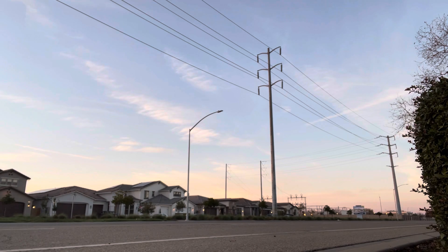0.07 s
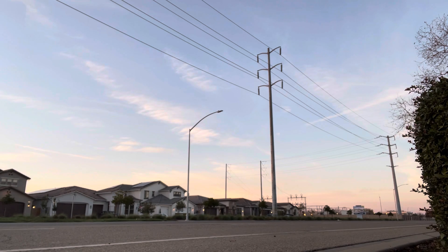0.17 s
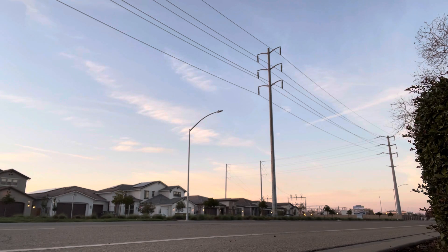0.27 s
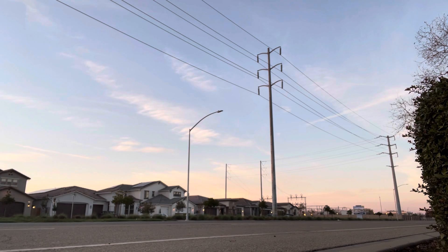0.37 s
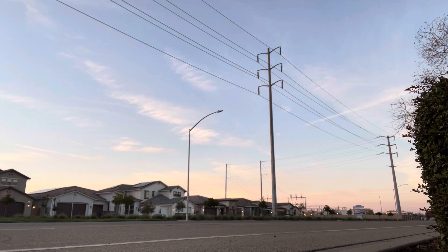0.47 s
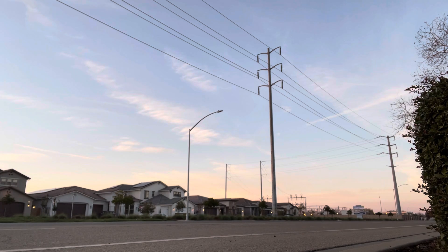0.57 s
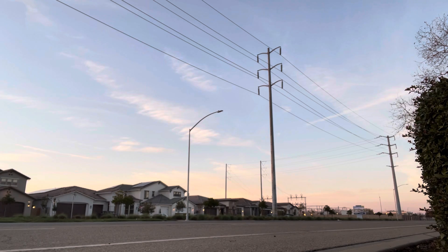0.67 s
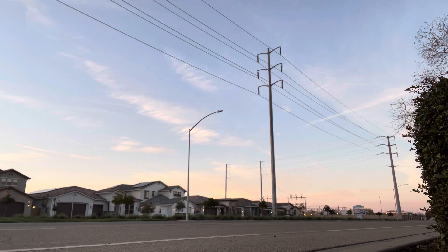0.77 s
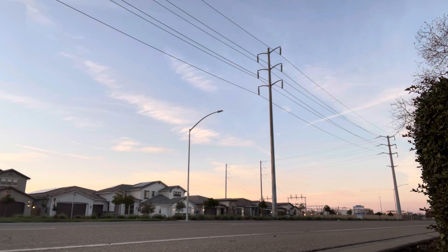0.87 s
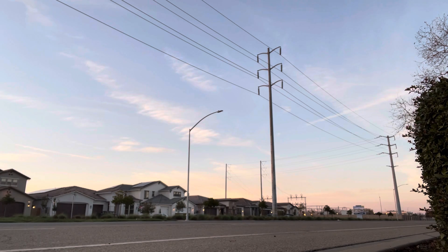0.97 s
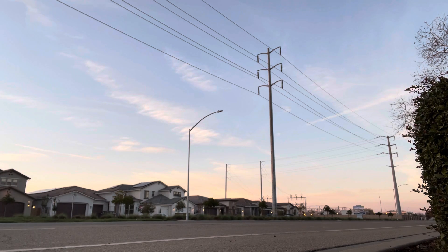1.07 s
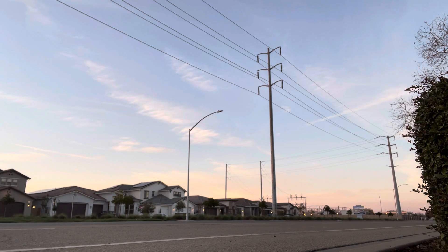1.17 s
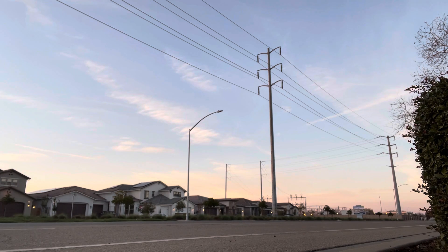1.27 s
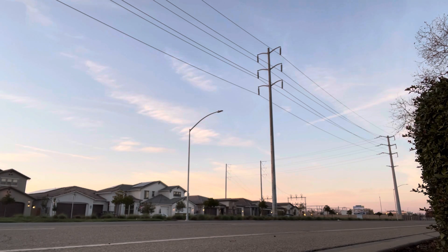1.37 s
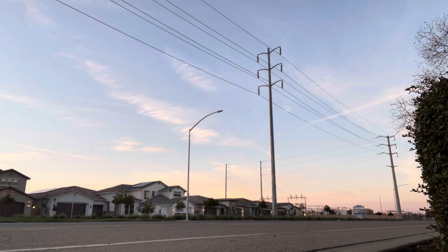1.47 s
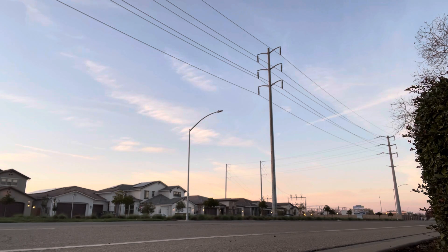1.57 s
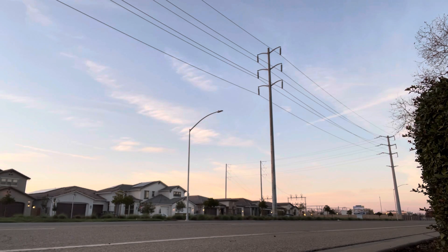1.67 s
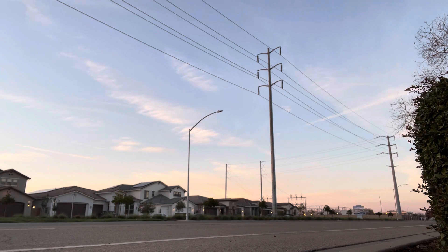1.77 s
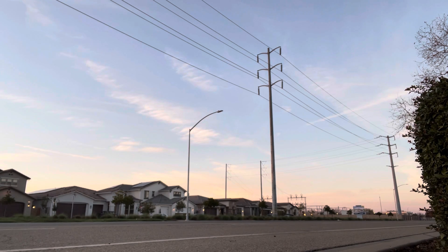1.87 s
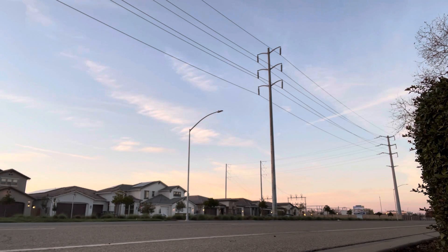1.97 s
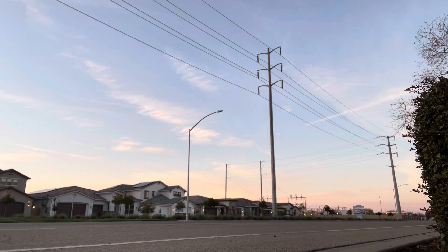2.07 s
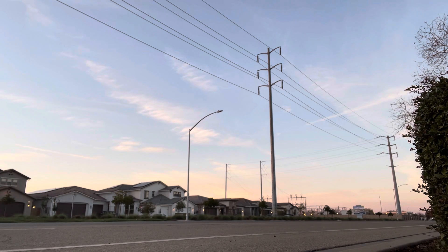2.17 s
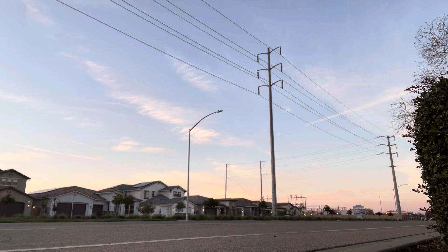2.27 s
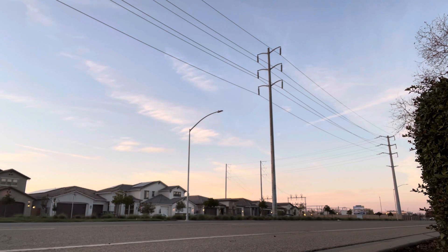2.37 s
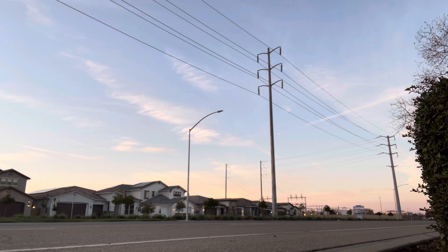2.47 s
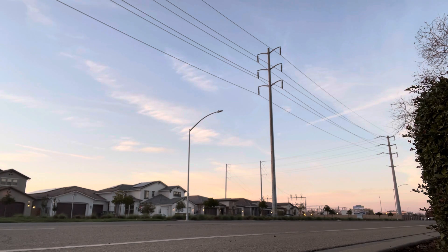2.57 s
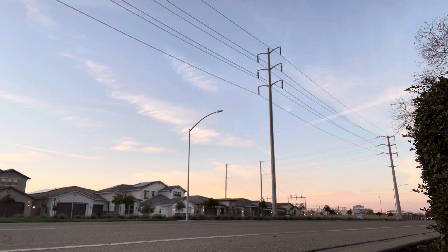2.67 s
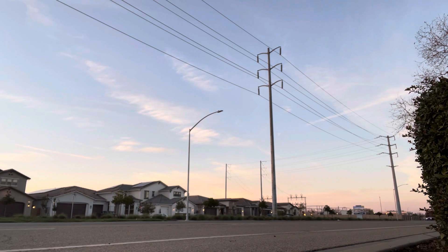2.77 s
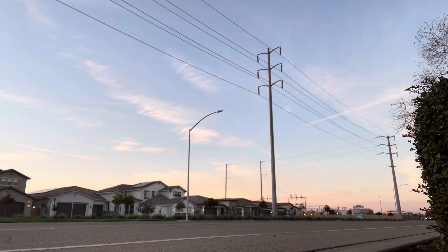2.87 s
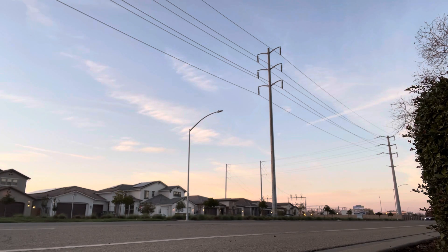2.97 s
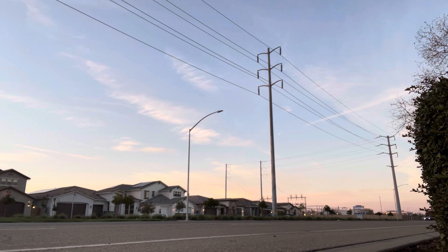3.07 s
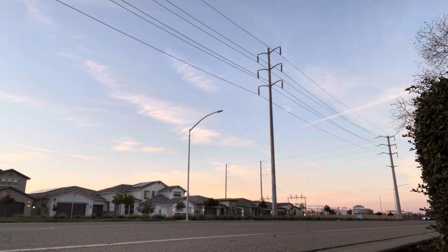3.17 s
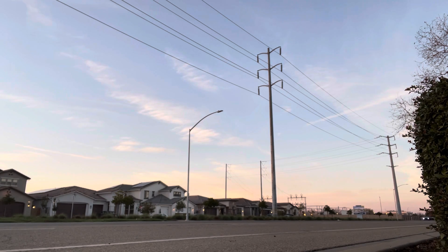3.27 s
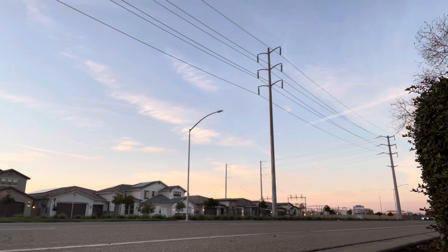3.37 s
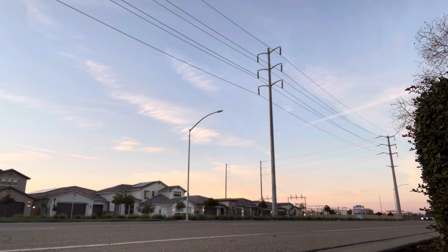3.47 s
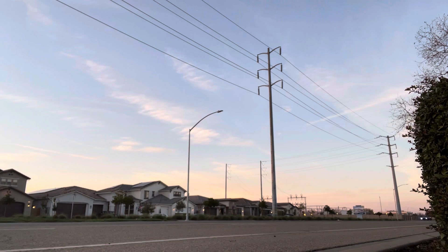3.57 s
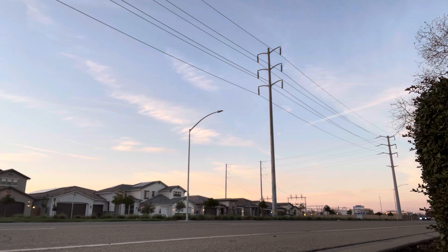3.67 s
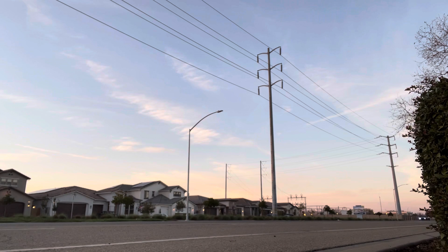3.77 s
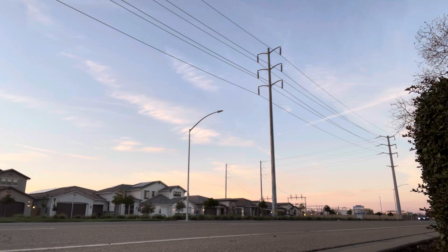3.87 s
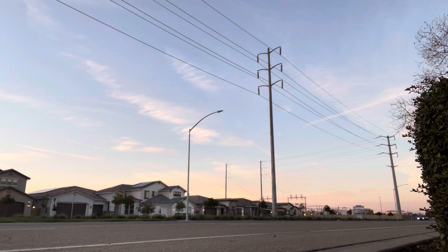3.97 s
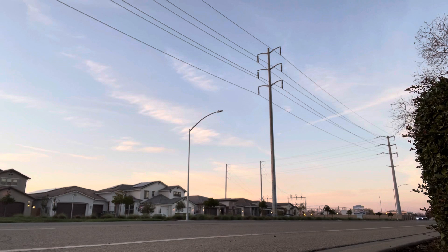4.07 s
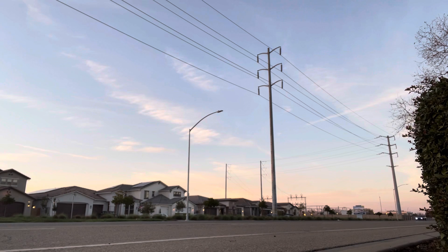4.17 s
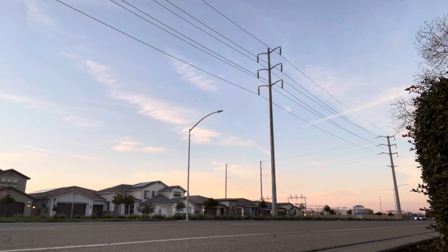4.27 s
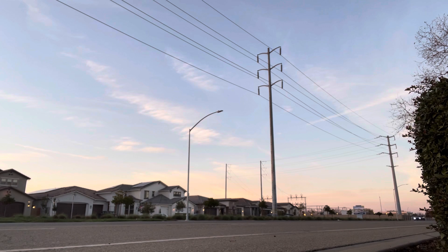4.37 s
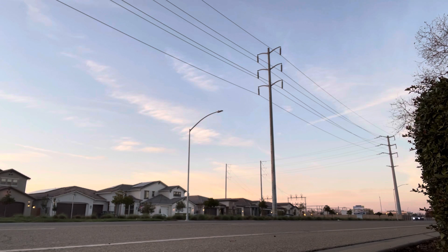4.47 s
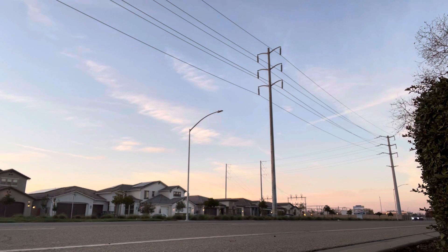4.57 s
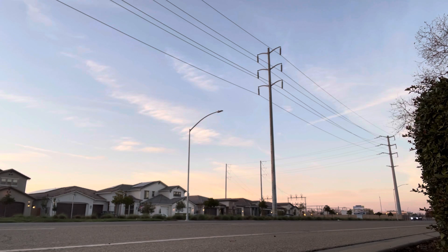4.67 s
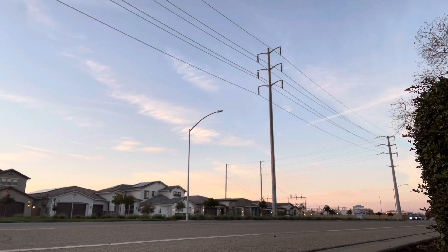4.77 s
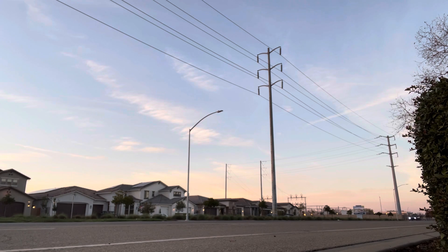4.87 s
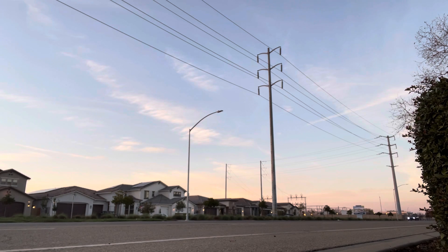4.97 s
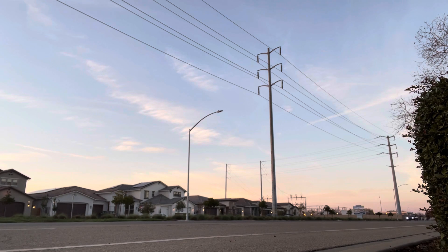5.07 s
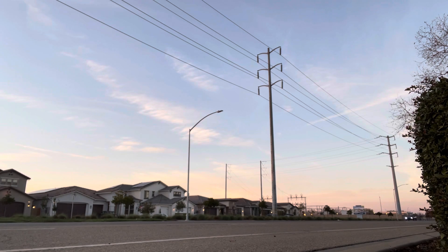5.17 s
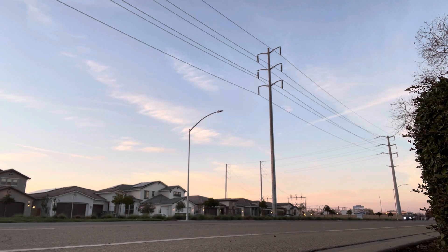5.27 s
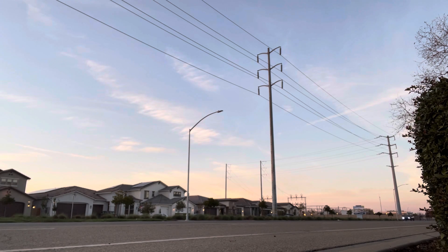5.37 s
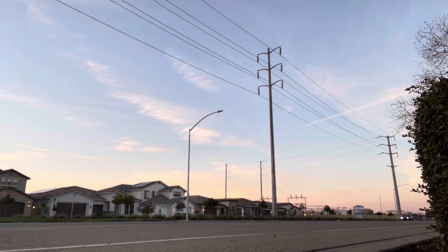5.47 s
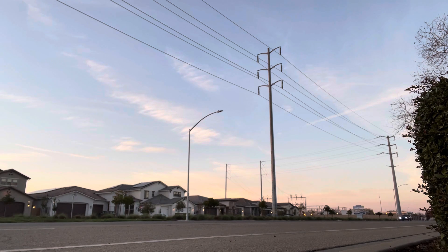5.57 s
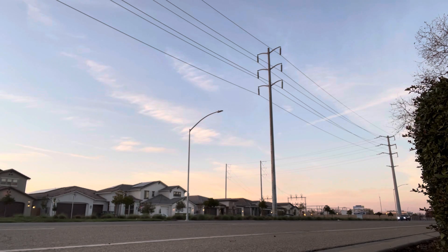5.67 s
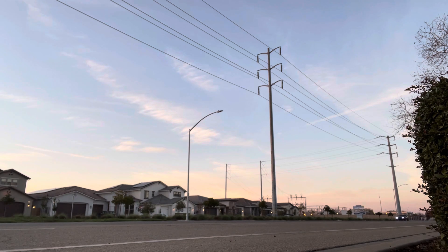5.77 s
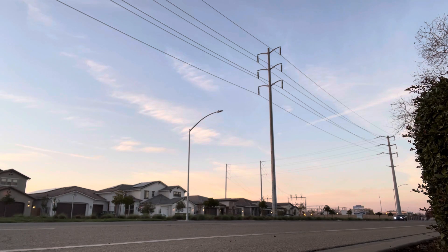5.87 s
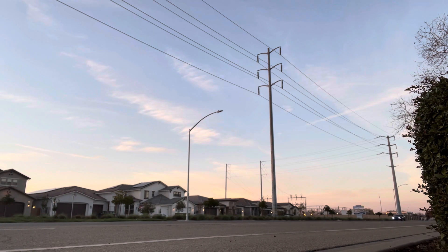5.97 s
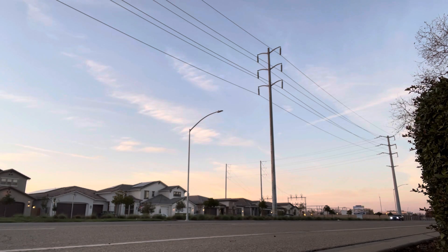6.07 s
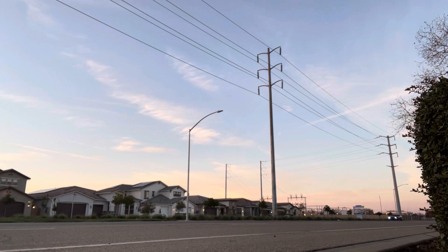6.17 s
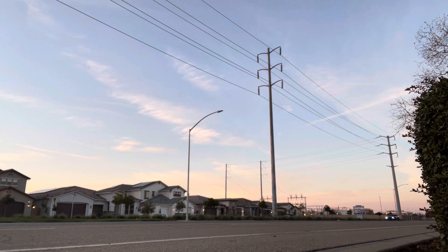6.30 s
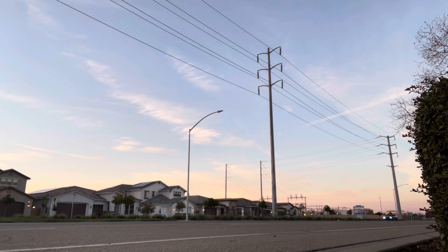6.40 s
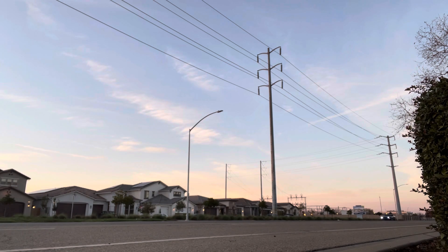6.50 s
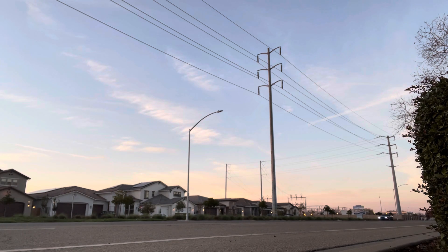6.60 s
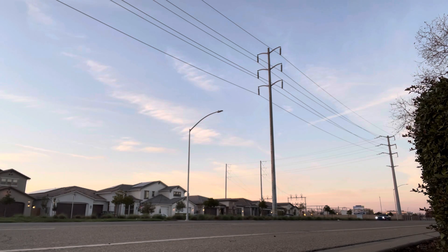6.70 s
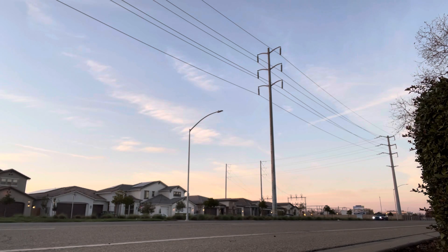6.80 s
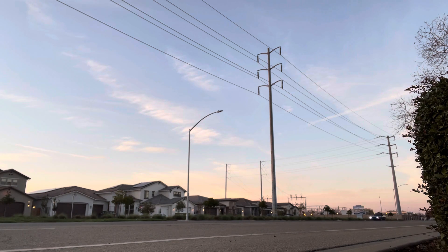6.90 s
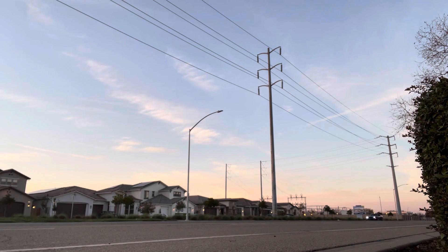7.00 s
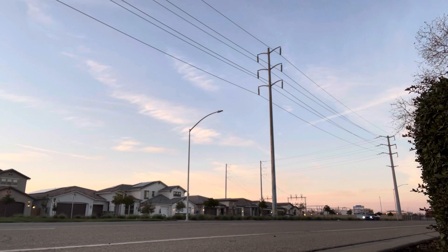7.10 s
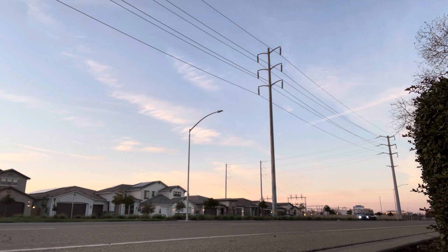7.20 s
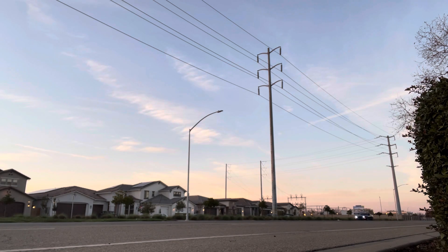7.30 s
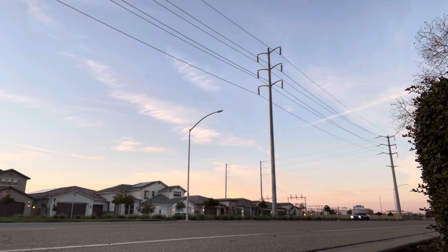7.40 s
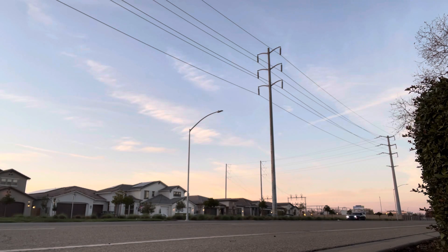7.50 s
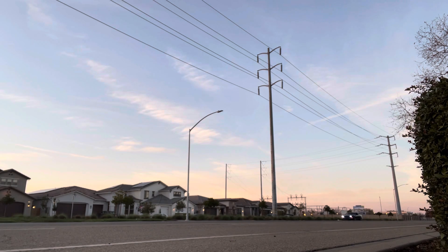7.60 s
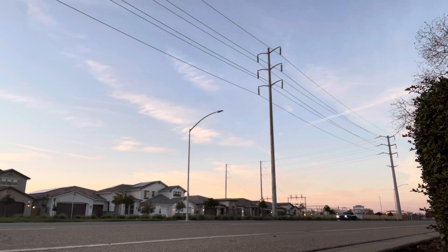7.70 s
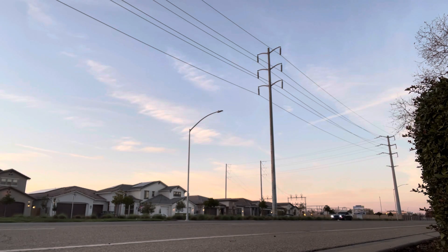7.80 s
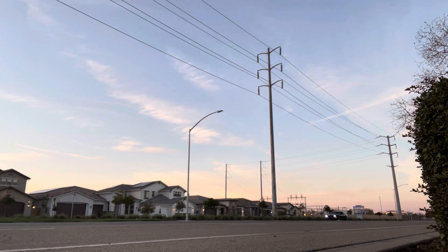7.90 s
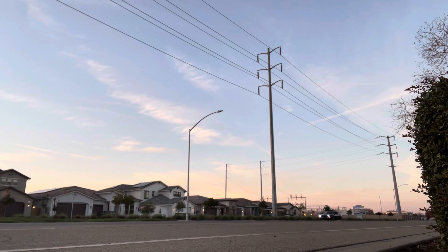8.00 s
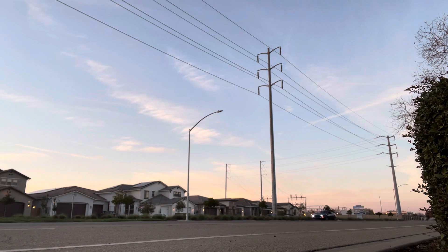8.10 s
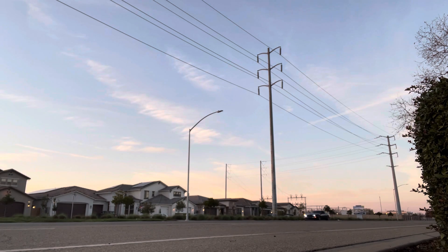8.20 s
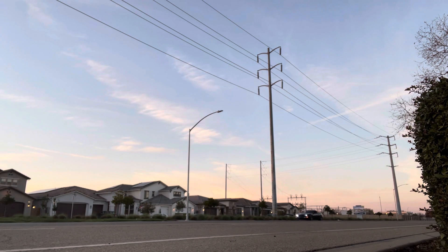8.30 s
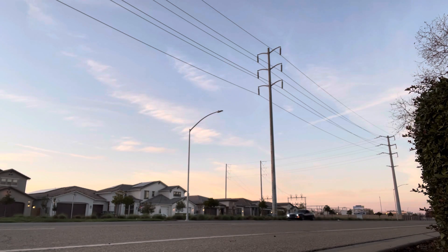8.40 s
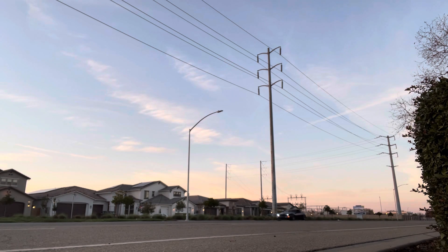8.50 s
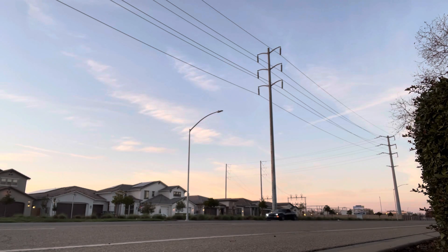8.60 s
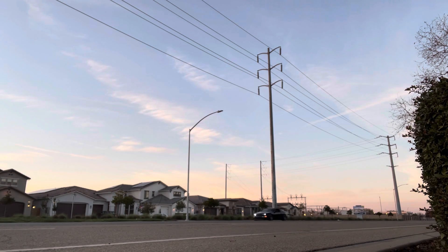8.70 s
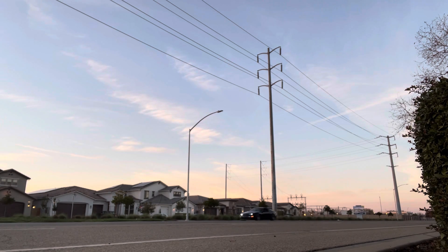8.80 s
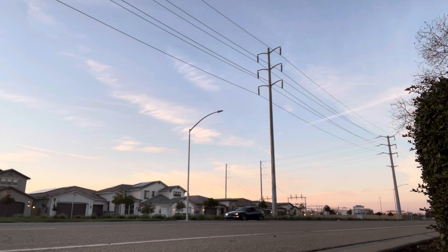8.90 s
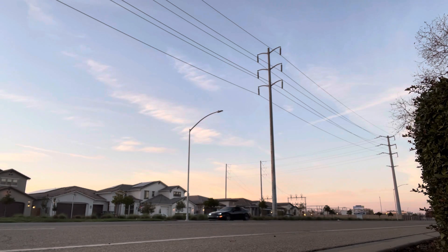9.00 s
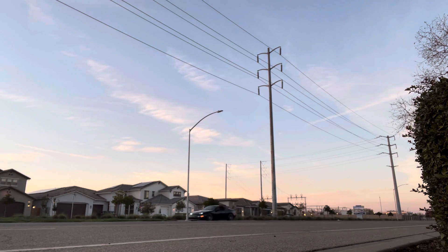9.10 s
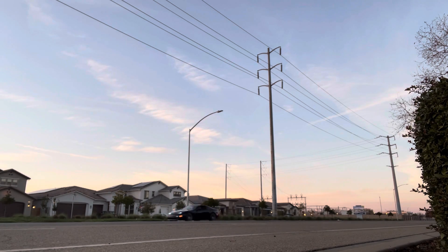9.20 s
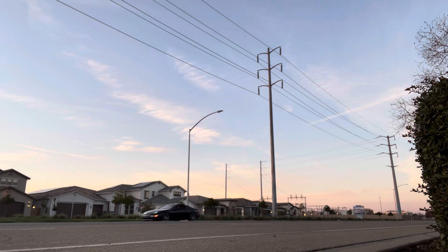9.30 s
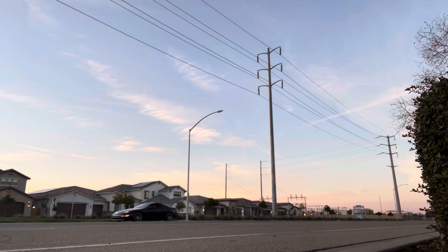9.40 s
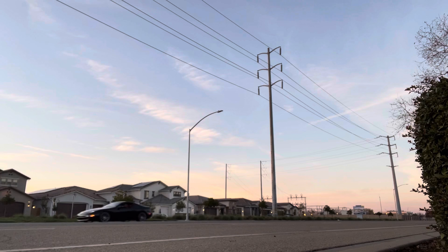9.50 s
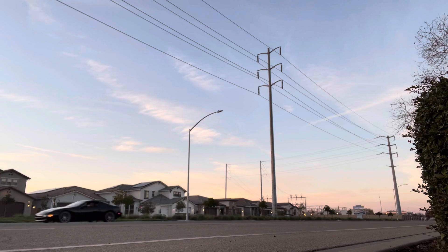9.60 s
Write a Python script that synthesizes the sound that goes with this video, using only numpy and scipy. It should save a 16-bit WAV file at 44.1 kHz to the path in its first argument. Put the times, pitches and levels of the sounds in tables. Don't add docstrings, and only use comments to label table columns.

```python
import sys
import numpy as np
from scipy import signal
from scipy.fft import rfft, irfft, next_fast_len
from scipy.io import wavfile
from scipy.ndimage import uniform_filter1d

SR = 44100
rng = np.random.default_rng(int(sys.argv[2]) if len(sys.argv) > 2 else 0)


def pcm_store(signal):
    levels = np.round(np.clip(np.atleast_2d(signal), -1, 1) * 32767)
    wavfile.write(sys.argv[1], SR, levels.astype(np.int16).T)


def volts(x):
    e = np.asarray(x, float) / 20
    return 10 ** e


N = 425565
T = np.arange(N) / SR
M = next_fast_len(N)
F = np.fft.rfftfreq(M, 1 / SR)


def curve(table):
    s, *columns = np.transpose(table)
    return [np.interp(T, s, c) for c in columns]


def over_hz(table, hz=F):
    f, v = np.transpose(table)
    return np.interp(np.log(hz + 1), np.log(f + 1), v)


def walk(rate):
    hold = int(SR / rate)
    steps = np.repeat(rng.standard_normal(N // hold + 1), hold)
    return 1.3 * uniform_filter1d(uniform_filter1d(steps, hold), hold)[:N]


def passing(s, half_s, t=T):
    return np.exp(-((t - s) / half_s) ** 2)


def tone(table, wobble=0., fade_s=.01):
    hz, db = curve(table)
    gate = np.clip(np.minimum(T - table[0][0], table[-1][0] - T) / fade_s, 0, 1)
    phase = 2 * np.pi * np.cumsum(hz * (1 + wobble)) / SR
    return np.sqrt(2) * gate * volts(db) * np.sin(phase)


def bands(colour, gain_db, flicker_db, swell_db):
    noise = rfft(rng.standard_normal(M)) * volts(over_hz(colour))
    out, swell = 0, swell_db * walk(0.51)
    for hz in 22 * 2 ** np.arange(0, 10, .5):
        share = np.cos(np.pi / 2 * np.clip(2 * np.log2((F + 1) / hz), -1, 1)) ** 2
        out = out + irfft(noise * share, M)[:N] * volts(gain_db(hz) + swell + flicker_db * walk(9))
    return out


# pitch_hz, lead_rad
PORT_PHASE = [(1, 0), (60, -.5), (260, -1.4), (690, -1.8), (1290, -1.7), (1600, -2.5), (2300, -2),
              (3100, -2.7), (4500, -1.8), (7000, -2.2), (8600, -2.85), (9700, -2.7), (10600, -.8)]
# pitch_hz, level_db
PORT_LEVEL = [(60, 1), (140, 0), (250, -1), (500, -3.5), (800, -10.5), (1230, -10.5), (1900, -2.5),
              (2900, 5.5), (8000, 0.2), (12000, -6.5)]
# pitch_hz, likeness (0-1)
PORT_LIKENESS = [(40, .97), (120, .78), (250, .55), (500, .25), (1000, .78), (2000, .92), (4000, .6),
                 (7000, .85), (9000, .9), (12000, .5)]


def ports(direct, scattered, side_on):
    hz, s, near = signal.stft(direct, SR, nperseg=1024)
    diffuse = signal.stft(scattered, SR, nperseg=1024)[2]
    like = np.clip(over_hz(PORT_LIKENESS, hz), 0, 1)[:, None]
    bass_share = 1 / (1 + (hz / 4000) ** 4)
    share = 1 - np.outer(bass_share, 1 - np.interp(s, T, side_on + 0 * T))
    half = volts(over_hz(PORT_LEVEL, hz)[:, None] * share / 2)
    turn = np.exp(1j * over_hz(PORT_PHASE, hz)[:, None] * share)
    left = (like * near + np.sqrt(1 - like ** 2) * diffuse) * half * turn
    return signal.istft(np.array([left, near / half]), SR)[1][:, :N]


# pitch_hz, level_db (per Hz)
TRAFFIC_COLOUR = [(20, -14), (50, 10), (90, 19), (190, 8.5), (310, 9), (420, -3), (650, 0), (1050, -0.5),
                  (1350, -4), (1700, -12.5), (2500, -25.5), (3300, -41.5), (7000, -48.5), (13000, -49.5)]
# pitch_hz, level_db
HUM = [(120, -40.5)]
# start_s, pitch_hz, level_db
COAST = [
    (0.6, 86.5, -56),
    (0.876, 78.2, -48),
    (0.99, 70.4, -43.5),
    (1.328, 61.7, -65),
    (1.35, 63.6, -59),
]


def town():
    far, spread = (bands(TRAFFIC_COLOUR, lambda hz: 0, flicker_db=1.4, swell_db=.8) for _ in range(2))
    scale = volts(-44) / far.std()
    hum = np.zeros(N)
    for hz, db in HUM:
        hum += np.sqrt(2) * volts(db + 1.2 * walk(3.1)) * np.sin(2 * np.pi * hz * T + .7 * walk(6.8))
    return ports(scale * far + hum + tone(COAST, fade_s=0.066), scale * spread, 1.0)


def glide(s, length, from_hz, to_hz, db, **how):
    peak = 0.3
    return tone([(s, from_hz, db - 5.5),
                 (s + peak * length, from_hz + peak * (to_hz - from_hz), db),
                 (s + length, to_hz, db - 7.5)], **how)


# share of length (0-1), pitch_hz, level_db
TRILL_SHAPE = [(0, 6580, -26), (.07, 6900, -9.5), (.36, 7380, -3.5), (0.521, 7390, -1.5), (.62, 7430, -4),
               (.92, 7880, -1), (.96, 7470, 2), (1, 7170, -14.5)]
# start_s, length_s, pitch factor, level_db
TRILLS = [
    (3.259, .455, .99, -69),
    (4.24, .435, 1.01, -72),
]


def trills():
    out = np.zeros(N)
    for s, length, factor, db in TRILLS:
        call = [(s + u * length, factor * hz, db + d) for u, hz, d in TRILL_SHAPE]
        out += tone(call, .008 * walk(160)) * volts(3.0 * walk(70))
    return out


# time after start_s, pitch_hz, level_db
BUZZ_SHAPE = [(0, 850, -12), (.012, 1003, -1.5), (.02, 1023, 7), (.025, 1096, -5), (.031, 1150, 5.5),
              (.042, 1150, -2), (.058, 1030, -8)]
# pitch_hz, level_db
THROAT = [(3000, -22), (4200, -8), (5300, 9), (7000, 0), (8300, -20), (9500, -27)]
# start_s, level_db, brightness_db (per octave)
BUZZES = [
    (.503, -81, -3),
    (1.855, -83.5, -20),
    (2.757, -77, -5),
]


def buzzes():
    out, rough = np.zeros(N), .034 * walk(400)
    for s, db, bright_db in BUZZES:
        for k in range(3, 11):
            tilt_db = bright_db * np.log2(k / 5)
            call = [(s + t, k * hz, db + d + over_hz(THROAT, k * hz) + tilt_db) for t, hz, d in BUZZ_SHAPE]
            out += tone(call, rough, fade_s=.006) * volts(4 * walk(120))
    return out


# start_s, level_db, pitch_hz (centre), width_hz, length_s
CHIPS = [(3.443, -75, 4270, 796, .04), (3.953, -75.5, 5300, 2010, 0.018), (6.26, -67, 6200, 1400, 0.24),
         (7.18, -63.5, 6140, 1400, 0.19), (7.347, -67.5, 6500, 900, .12), (7.25, -56, 3180, 220, .07),
         (3.09, -76, 5500, 600, .03), (1.05, -77, 2400, 2200, .07)]


def chips():
    out, size = np.zeros(N), 16384
    hz = np.fft.rfftfreq(size, 1 / SR)
    for s, db, centre_hz, width_hz, length in CHIPS:
        band = np.exp(-((hz - centre_hz) / width_hz * 2) ** 2)
        puff = irfft(rfft(rng.standard_normal(size)) * band)
        swell = np.sin(np.pi * np.clip(T[:size] / length, 0, 1) ** .7) ** 2
        out[int(s * SR):int(s * SR) + size] += puff * swell * volts(db) / puff.std()
    return out


# start_s, length_s, from_hz, to_hz, level_db
SLIDES = [
    (4.133, .04, 9200, 7700, -74.5),
]
# start_s, length_s, from_hz, to_hz, level_db
SEEPS = [
    (5.17, .11, 6900, 8100, -76),
    (6.05, 0.11, 6600, 7900, -67),
    (6.96, 0.12, 6200, 8295, -62.5),
]
# start_s, pitch_hz, level_db
WARBLES = [
    [(.236, 5900, -80), (.247, 5150, -71), (.266, 5750, -74), (.275, 5050, -67), (.284, 5500, -74),
     (.291, 5100, -75), (.305, 3200, -86)],
    [(1.755, 6400, -86), (1.769, 5250, -76), (1.787, 5070, -73), (1.795, 5400, -74), (1.803, 5000, -69),
     (1.817, 4600, -75), (1.828, 3400, -88.5)],
]
# start_s, pitch_hz, level_db
DROP = [
    (4.132, 4550, -67),
    (4.165, 3930, -81.5),
    (4.225, 3820, -76.5),
    (4.244, 4300, -77.5),
]
# start_s, pitch_hz, level_db
WHISTLE = [(4.14, 2190, -66), (4.186, 2230, -65), (4.308, 2280, -58), (4.43, 2619, -52.5),
           (4.512, 2850, -55), (4.55, 2910, -64.5), (4.578, 2900, -52), (4.605, 2900, -61)]


def birds():
    clean = sum(glide(*c, fade_s=.004) for c in SLIDES)
    clean += sum(tone(c, fade_s=.004) for c in [*WARBLES, DROP])
    clean += trills() + buzzes()
    t = T[:SR // 6]
    leaves = rng.standard_normal(len(t)) * volts(-41 - 60 * t / .25)
    clean += signal.fftconvolve(clean, leaves)[:N]
    far = chips() + sum(glide(*c, wobble=.004 * walk(200)) for c in SEEPS)
    whistle = tone(WHISTLE, fade_s=.05)
    return clean * volts([[0.5], [-.5]]) + far * np.array([[3.], [-1.]]) + whistle * volts([[1.5], [-1.5]])


# start_s (middle),
# half_s, pitch_hz, half_width_octaves, level_db
TYRES = [(3.05, .45, 677, 0.61, 9.5), (8.649, .3, 4695, .35, -7.5), (9.25, 0.33, 4300, 0.49, 8),
         (5.8, .7, 3900, .2, 3), (5.0, .5, 2750, .15, -4), (8.4, .7, 6100, .12, 5),
         (8.5, .5, 2350, .15, 2.5), (9.55, .2, 2600, .18, -5), (9.5, .25, 6500, .25, 5),
         (8.5, .2, 850, .4, 2), (9.5, .15, 1100, .3, 2.5), (1.5, .4, 1500, .5, 6), (4.3, .5, 5500, .6, -4),
         (6.7, .2, 3700, .25, 4), (7.2, .3, 2200, .5, 2)]


def shade(x):
    hz, t, z = signal.stft(x, SR, nperseg=1024)
    db = 0
    for s, half_s, centre_hz, wide, d in TYRES:
        band = np.exp(-(np.log2((hz + 1) / centre_hz) / wide) ** 2)
        db = db + d * np.outer(band, passing(s, half_s, t))
    return signal.istft(z * volts(db), SR)[1][:N]


MIDDLE_DB, MIDDLE_HZ = -45, 220
# pitch_hz, level_db (per Hz)
ROAR_COLOUR = [(20, -16.5), (50, 1), (100, 10), (250, 9.5), (500, 4), (1100, 0.5), (1550, -14), (2250, -18),
               (3000, -29), (3900, -29), (5200, -34), (8000, -39), (10000, -59), (11500, -67), (14000, -76)]
ROAR_AT_HZ = (400, 1000, 2000, 5000)
# start_s, lag_ms
GROUND = [(0, 0.03), (7.8, 0.094), (8.7, 0.105), (9, 0.1), (9.4, 0.077), (9.65, 0.065)]


def roar(db, octaves):
    shape = [0.5 - 0.4153 * (db - MIDDLE_DB),
             0 * db,
             4.5 + 5 * octaves,
             2 + 11.5 * octaves]

    def gain_db(hz):
        weights = [np.interp(np.log(hz), np.log(ROAR_AT_HZ), w) for w in np.eye(4)]
        return db + sum(w * s for w, s in zip(weights, shape))

    noise = volts(18) * shade(bands(ROAR_COLOUR, gain_db, flicker_db=1.3, swell_db=.4))
    return noise + volts(-9) * np.interp(T - curve(GROUND)[0] / 1000, T, noise)


# start_s, level_db (peak), pitch_hz, t60_s
POPS = [(5.995, -28, 148.5, 0.071), (6.056, -17, 133, 0.045), (6.188, -25, 147, 0.047),
        (6.258, -25, 136, 0.078), (6.404, -19.5, 142, 0.19), (6.427, -17, 118, 0.045),
        (8.819, -27, 91, 0.18), (8.849, -19, 105.3, 0.1), (8.97, -27, 125, 0.12),
        (9.038, -25.5, 119, 0.082), (9.191, -11.5, 137, 0.096), (9.228, -16.5, 100.8, 0.1)]


def pops():
    out = np.zeros(N)
    t = T[:SR // 4]
    for s, db, hz, t60 in POPS:
        ring = np.sin(2 * np.pi * hz * t * (1 - 1.5 * t))
        ring *= (1 - np.exp(-t / .003)) * volts(-60 * t / t60)
        i = int(s * SR)
        out[i:i + len(t)] += 2.6 * volts(db) * ring[:N - i]
    return out


# start_s, end_s, then level_db of the firing, the double and the uneven tones
LIFTS = [
    (6.04, 6.43, -21, -1, -2),
    (8.86, 9.12, -11, -2, -2),
    (8.79, 9.36, 0, -7, -14),
]


def throttle_db():
    foot_s = 0.092
    return sum(np.outer(db, np.clip(np.minimum(T - a, b - T) / foot_s + .5, 0, 1)) for a, b, *db in LIFTS)


# start_s (middle), multiple of camshaft turn, level_db,
# half_s
FADES_AND_SWELLS = [(4.76, 6, -4.5, 0.068), (4.97, 6, -22, 0.034), (5.15, 6, -4, 0.22), (5.936, 6, -6.5, .03),
                    (7.346, 6, -13.5, 0.077), (7.716, 6, 4.5, 0.059), (8.052, 6, -14, 0.048), (8.41, 6, 1.5, 0.085),
                    (8.6, 6, -18, 0.025), (9.225, 6, -22, 0.045), (3.422, 3, 7, 0.16), (5.03, 3, -8, 0.047),
                    (5.199, 3, 6, 0.26), (6.477, 3, -24, 0.018), (7.197, 3, -7.5, 0.046), (7.653, 3, 3, 0.055),
                    (7.738, 3, -6, 0.026), (8.07, 3, 4.5, 0.022), (8.47, 3, 4, 0.15), (8.772, 3, -16, 0.05),
                    (8.96, 3, -8, .06), (9.06, 3, 10.5, 0.033), (9.422, 3, 8, .02), (5.104, 12, 0.5, 0.32),
                    (6.534, 12, 8.5, .03), (6.729, 12, 17, 0.092), (7.382, 12, 4, .1), (8.44, 12, -15.5, 0.031),
                    (8.62, 12, 5, .06), (9.31, 12, -16, 0.058), (7.12, 3, 4, .3), (7.12, 6, 1, .3), (8.25, 6, 2, .12),
                    (8.8, 6, 3, .06), (8.97, 6, -9, .04), (9.06, 6, -6, .03), (3.9, 6, 3, .12), (3.66, 6, -3, .1),
                    (6.045, 12, -9, .035), (6.4, 12, -8, .05), (6.6, 12, 5, .08), (8.08, 12, -4, .1),
                    (3.7, 12, 5, .35), (6.05, 3, -5, .2), (6.3, 12, 5, .05), (6.2, 6, 7, .05), (2.9, 12, 4, .4),
                    (6.16, 12, 9, .08), (9.43, 12, 11, .06), (9.6, 12, 11, .07),
                    (1.953, 15, 15.5, 0.28), (1.9, 18, 11, 0.35), (2.599, 24, 9, .35), (2.798, 11, 4, .3),
          (3.254, 9, 7.5, 0.28), (3.252, 15, 13.5, 0.18), (4.098, 9, -8, 0.27), (4.2, 4, 5.5, .2),
          (4.4, 5, 8.5, .5), (5.452, 11, 10.5, 0.33), (5.604, 9, -7, .4), (5.702, 14, -1, .3),
          (2.6, 20, 8, .3), (3.1, 18, 5, .4), (5.5, 8, 4, .4), (5.9, 10, 7, .1), (6.2, 14, 6, .1),
          (6, 8, 6.5, .4), (6.2, 13, 4, .15), (3.3, 24, 9, .3), (5.55, 19, 7, .25), (5.8, 18, 5, .25),
          (5.8, 21, 14, .25), (5.3, 16, 5, .3), (4.9, 20, 6, .3), (7, 18, -9, .6), (3.6, 21, 12, .3),
          (4.62, 4, 6, .15), (6.08, 8, 6, .12), (6.1, 4, 7, .1), (6.3, 7, 7, .08), (6.1, 20, 7, .12),
          (2.5, 16, 7, .3), (3.4, 8, 6, .4), (3.7, 14, 6, .3), (2.3, 9, -4, .3), (7.85, 14, -6, .15),
          (9.5, 18, -12, .25), (8.6, 15, 7, .2), (8.5, 14, 6, .25), (8.3, 7, 5, .4), (9.5, 9, 9, .06),
          (8.95, 9, -10, .15), (6.755, 9, 6, 0.16), (7.451, 9, 8.5, .25), (8.05, 2, 10.5, .3),
          (8.301, 9, 4, .45), (9.549, 9, -7, .15), (8.202, 8, 8.5, 0.65)]


def passing_db(multiple):
    return sum(db * passing(s, half_s) for s, k, db, half_s in FADES_AND_SWELLS if round(k) == multiple)


# start_s, pitch_hz (firing rate), level_db, imbalance_db (of the two banks)
ENGINE = [(1.55, 54.85, -40.5, -15.5), (1.71, 77.1, -19, -37.5), (1.88, 88.36, -18, -32.5),
          (2.33, 86.06, -17.5, -35), (2.97, 114.1, -25, -29.5), (3.49, 141.6, -23, -20),
          (4.6, 212.9, -20.5, -33), (5.56, 288.9, -27, 7), (5.99, 316, -24.5, 2.5),
          (6.11, 291.5, -27.5, -2), (6.45, 254.3, -22, -3), (6.72, 201.5, -21.5, -8),
          (7.9, 246.5, -14.5, -11.5), (8.74, 276.9, -12.5, -7.5), (9.02, 248.7, -15.5, -16.5),
          (9.33, 221.5, -14, -22), (9.485, 185.4, -13.5, -25.5), (9.65, 186.8, -14.5, -27.5)]
# start_s, pitch_hz, level_db
BLIP = [
    (1.33, 60.5, -46),
    (1.404, 74.2, -41),
    (1.492, 86.7, -27.5),
    (1.52, 92.4, -29),
    (1.58, 98, -34),
    (1.62, 91.5, -33),
]
# multiple of camshaft turn, level_db (under the uneven level)
UNEVEN = [(2, -3.5), (4, -3.5), (5, 2), (7, -6), (8, -3.5), (9, 6), (10, -10), (11, -1), (13, -10),
          (14, -4.5), (15, -6.5), (16, -6.5), (17, -8), (18, 1.5), (19, -7), (20, -7), (21, -18),
          (22, -10.5), (23, -9.5), (24, -9.5), (26, -8)]
# pitch_hz, level_db
SILENCER = [(30, -35), (70, -9), (130, -6.5), (210, 2.5), (350, -6), (550, -2.5), (800, -11), (1300, -12.5)]
# pitch_hz, level_db
DOUBLE = [(170, -23.5), (215, -0.5), (275, -11), (390, -22), (480, -13), (535, -14), (580, -17.5),
          (630, -14.5)]
HOPS_S = [2.87, 3.05, 3.27, 3.44, 3.77, 3.92, 4.19]
WHINE = (7.885, 8.985)
# start_s, level_db of the low whine, level_db of the high whine
WHINE_LEVEL = [(4.4, -80, -90), (5.0, -66, -75), (5.8, -58, -68), (6.1, -66, -72), (7.4, -64, -62),
               (8.1, -57, -53), (8.75, -45, -50), (9.0, -46, -49), (9.12, -62, -64)]


def exhaust(roar_db):
    hz, level_db, imbalance_db = curve(ENGINE)
    cam_hz = hz / 6
    cam = 2 * np.pi * np.cumsum(cam_hz) / SR
    level_db = level_db + sum(-9 * passing(s, .022) for s in HOPS_S)
    lift_db, double_db, uneven_db = throttle_db()
    double_db = double_db + over_hz(DOUBLE, 2 * hz)
    uneven_db = uneven_db - 39.5 + 0.68 * (roar_db - MIDDLE_DB)
    rasp_db = 8 * np.log2(hz / 250)
    tones = [(k, level_db + db + passing_db(k)) for k, db in [(6, lift_db), (3, imbalance_db), (12, double_db)]]
    for k, db in UNEVEN:
        rasp_share = 1 if k % 3 else -.4 * (k > 10)
        db = db + uneven_db + passing_db(k) + rasp_share * rasp_db
        tones.append((k, db + over_hz(SILENCER, k * cam_hz) + 2 * walk(5)))
    out = np.zeros(N)
    for k, db in tones:
        low_cut_db = np.minimum(18 * np.log2(k * cam_hz / 58), 0)
        slip = .00009 * hz * walk(15)
        out += volts(db + low_cut_db + 2.4 * walk(11)) * np.sin(k * (cam + slip))
    for k, db in zip(WHINE, curve(WHINE_LEVEL)):
        out += volts(db + 1.5 * walk(8)) * np.sin(6 * k * cam + .7 * walk(30))
    start = np.clip((T - ENGINE[0][0]) / 0.089, 0, 1)
    return np.sqrt(2) * out * start + tone(BLIP, fade_s=0.025)


# start_s, level_db
ROAR = [(0, -82), (1.3, -66.5), (2.5, -58.5), (3, -57.5), (3.55, -57.5), (4.5, -52), (5, -48.5), (5.8, -42),
        (6.3, -44), (6.85, -42.5), (7.2, -41), (8.4, -30.5), (9, -30), (9.65, -29)]
# start_s, share side-on (1 side, 0 front, below 0 just
BEARING = [(0, 0.8), (7.5, 0.9), (8.3, 0.77), (8.9, 0.59), (9.2, 0.2), (9.65, -.2)]
# delay_s, level_db
STREET = [
    (.047, -15),
    (.11, -13.5),
    (.19, -12.5),
    (.31, -9),
    (.52, -15),
]


def car():
    db = curve(ROAR)[0]
    octaves = np.log2(curve(ENGINE)[0] / MIDDLE_HZ)
    near, spread = (roar(db, octaves) for _ in range(2))
    pipe = exhaust(db) + pops()
    fronts = sum(volts(g) * np.interp(T - s, T, pipe, left=0) for s, g in STREET)
    fronts *= volts(-.45 * np.maximum(db - MIDDLE_DB, 0))
    return ports(pipe + near + volts(-9.5) * fronts, volts(-1.5) * fronts + spread, curve(BEARING)[0])


def scene():
    return town() + birds() + car()


def top_cut(x):
    return signal.sosfilt(signal.butter(12, 13100, fs=SR, output="sos"), x)


def record(dry):
    held = np.tanh(1.054 * dry) / 1.173
    mirrored = held * (1 + volts(-69) * np.cos(2 * np.pi * 12000 * T))
    return top_cut(mirrored)


dry = scene()
out = record(dry)
pcm_store(out)
```